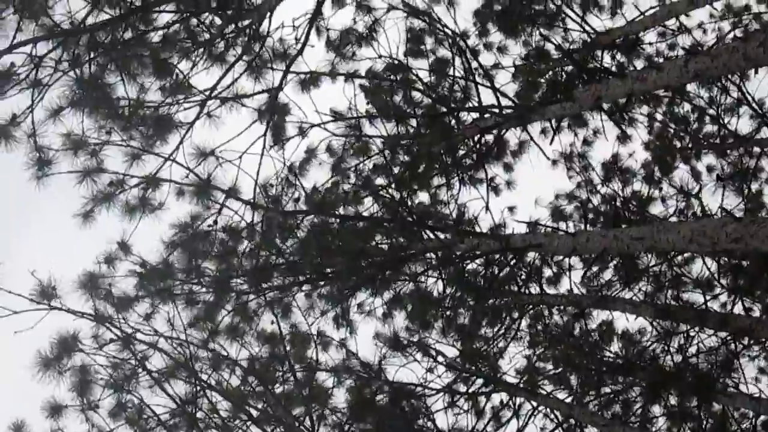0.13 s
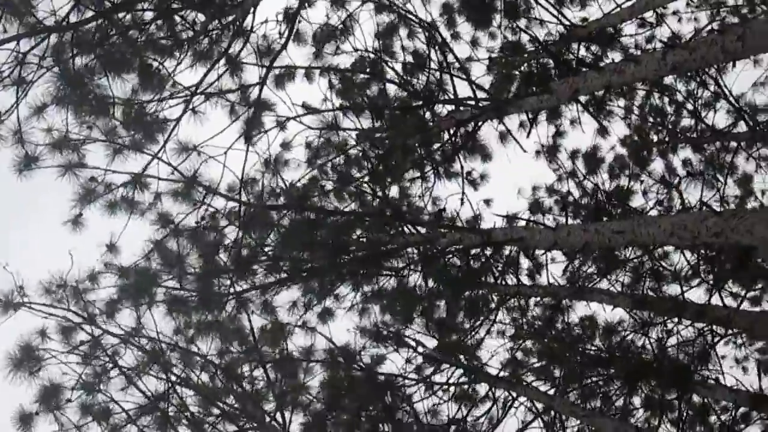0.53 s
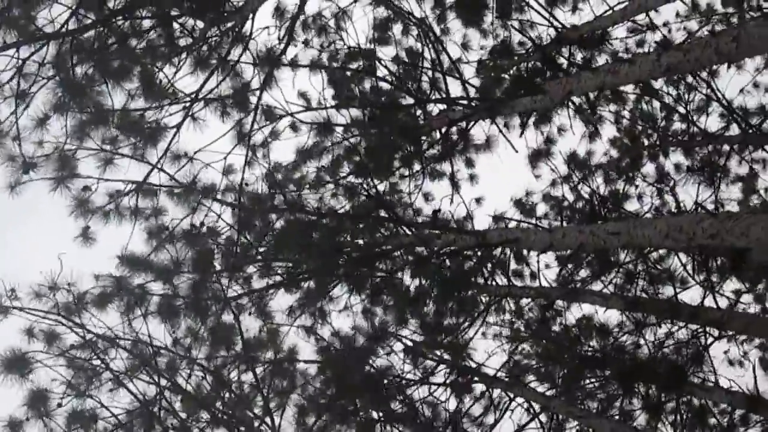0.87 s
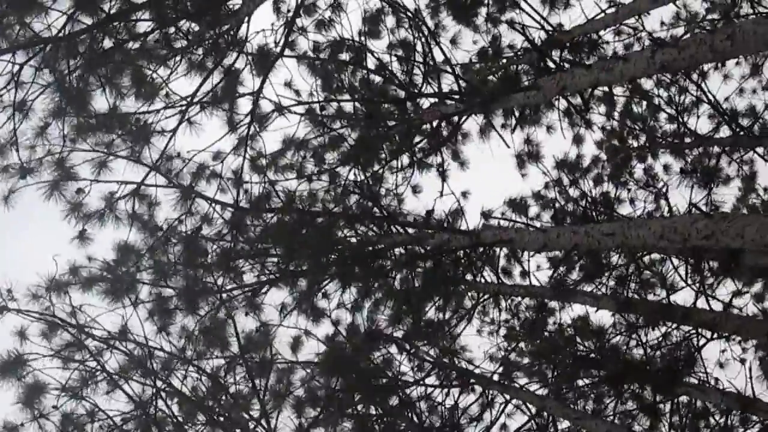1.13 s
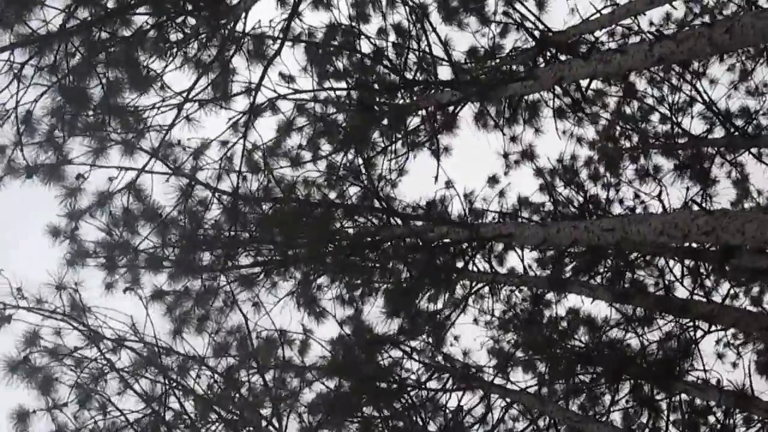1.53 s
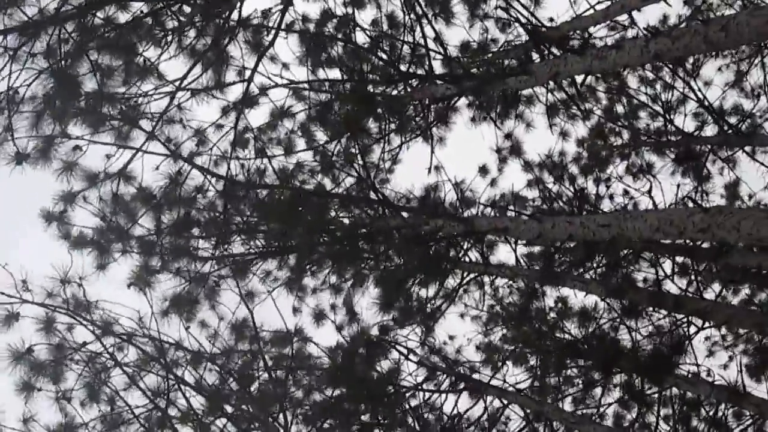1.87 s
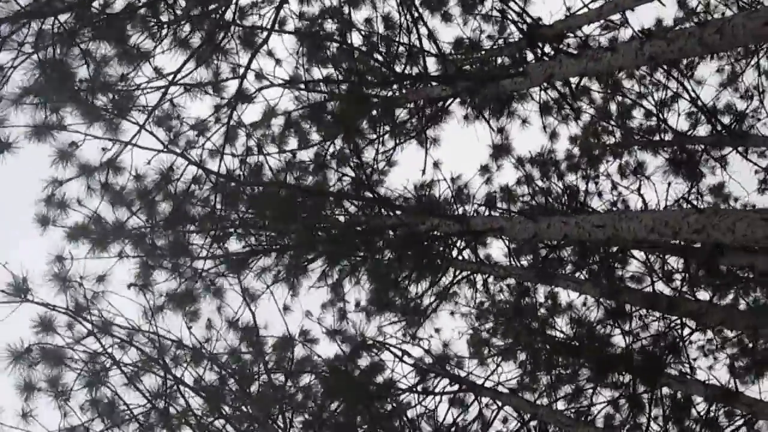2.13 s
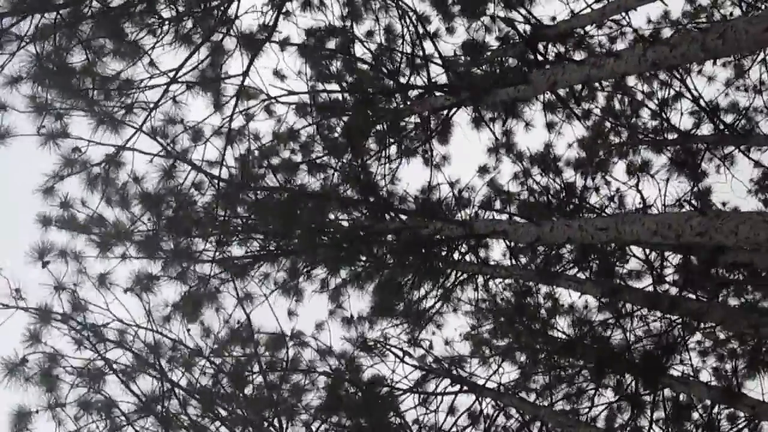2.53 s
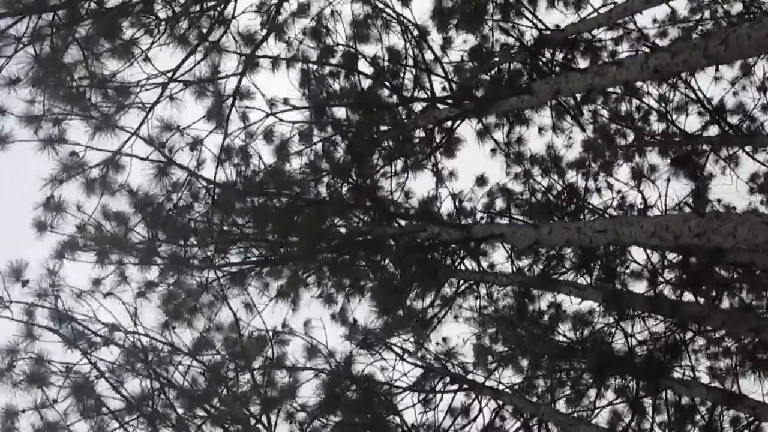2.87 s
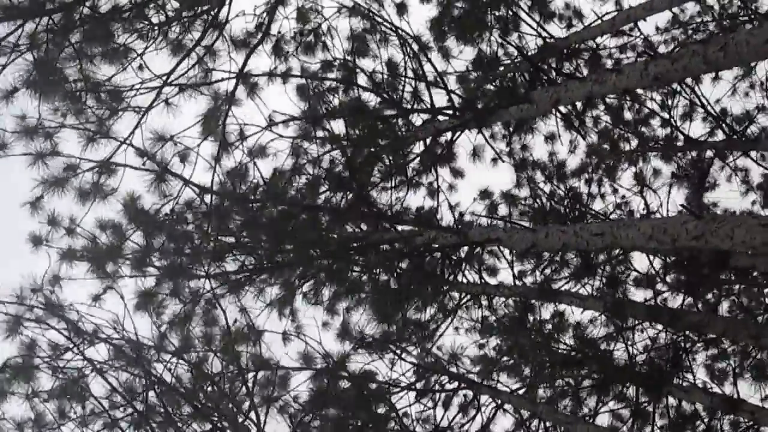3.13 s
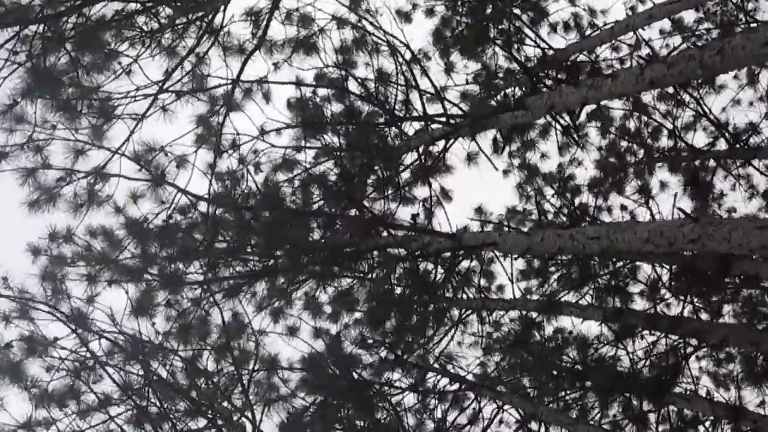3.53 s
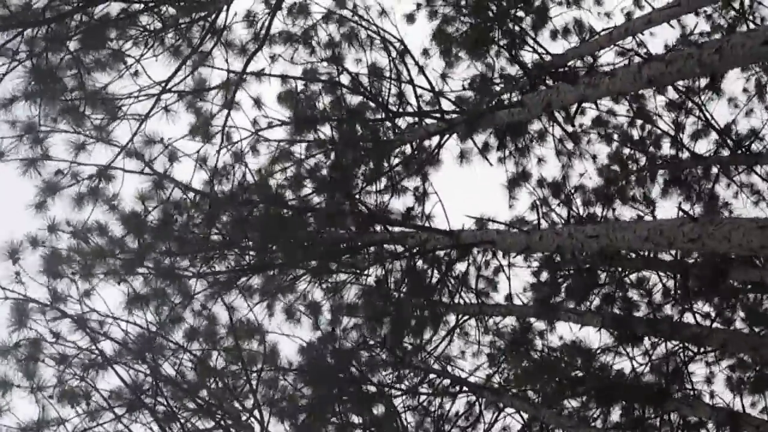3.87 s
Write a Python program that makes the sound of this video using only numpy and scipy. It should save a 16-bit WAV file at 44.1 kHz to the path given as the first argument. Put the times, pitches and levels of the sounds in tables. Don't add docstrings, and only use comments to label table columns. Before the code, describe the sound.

Wind rushes through tall pine crowns, a broad roar with fine needle hiss and twig ticks.

```python
import sys
import numpy as np
from scipy import signal
from scipy.fft import rfft, irfft
from scipy.io import wavfile
from scipy.ndimage import uniform_filter1d

SR = 44100
rng = np.random.default_rng(int(sys.argv[2]) if len(sys.argv) > 2 else 0)


def wav_record(signal):
    frames = np.transpose(np.atleast_2d(signal))
    bounded = np.clip(frames, -1, 1)
    quanta = np.round(bounded * 32767).astype(np.int16)
    wavfile.write(sys.argv[1], SR, quanta)


def invert_db(x):
    u = np.asarray(x, float) / 20
    return 10 ** u


N = 176400


def rms_one(x):
    return x / np.sqrt(np.mean(x ** 2) + 1e-20)


def in_time(rows):
    s, *columns = np.transpose(rows)
    return [np.interp(np.arange(N) / SR, s, c) for c in columns]


def at_hz(points, hz):
    table_hz, table_db = np.transpose(points)
    return np.interp(np.log(hz), np.log(table_hz), table_db)


def drift(rate_hz):
    r = np.exp(-80 * np.pi * rate_hz / SR)
    steps = rng.standard_normal(N // 40 + 2002)
    slow = signal.lfilter([1], [1, -2 * r, r * r], steps)[2000:]
    return np.interp(np.arange(N) / 40, np.arange(len(slow)), rms_one(slow))


def resonance(x, hz, width_hz):
    r = np.exp(-np.pi * width_hz / SR)
    poles = [1, -2 * r * np.cos(2 * np.pi * hz / SR), r * r]
    return signal.lfilter([(1 - r * r) / 2, 0, (r * r - 1) / 2], poles, x + 1e-18)


def dulled(x):
    return signal.sosfilt(signal.butter(3, 7060, fs=SR, output="sos"), x)


# f/Hz, level/dB
PORT_DIFFERENCE = [(1000, -60), (2500, -39.5), (3800, -27), (4800, -20), (6000, -17.5), (8000, -16),
                   (12000, -13)]


def rush(spectrum, shared_db, own_db, sway):
    low_hz, top_hz = spectrum[0][0], spectrum[-1][0]
    edges = np.geomspace(low_hz, top_hz, int(2 * np.log2(top_hz / low_hz) + 1.5))
    hz = np.maximum(np.fft.rfftfreq(N, 1 / SR), 1)
    shape = invert_db(at_hz(spectrum, hz)) * (hz > low_hz) * (hz < top_hz)
    mid_bins, side_bins = rfft(rng.standard_normal((2, N))) * shape
    place = np.interp(np.log(hz), np.log(edges), np.arange(len(edges)))
    mid = 0
    for k in range(len(edges)):
        band = irfft(mid_bins * np.clip(1 - np.abs(place - k), 0, 1), N)
        mid = mid + invert_db(own_db * drift(11)) * band
    side = irfft(side_bins * invert_db(at_hz(PORT_DIFFERENCE, hz)), N)
    return rms_one(invert_db(shared_db * sway) * np.array([mid + side, mid - side]))


# f/Hz, width/Hz, level/dB
CASE = [(2300, 380, 2), (3250, 480, -4), (4260, 450, -5), (5430, 400, -16), (8210, 400, -24)]
# t/s, level/dB
RUB = [
    (.036, -47.5),
    (.052, -55),
    (.061, -44),
    (.074, -42),
    (.080, -38),
    (.088, -35.5),
    (.097, -54),
    (.11, -90),
]


def finger_rub():
    level_db, = in_time(RUB)
    slips_per_s = 2300
    sizes = invert_db(2.9 * rng.exponential(1, N)) * rng.choice([-1, 1], N)
    slips = (rng.random(N) < slips_per_s / SR) * sizes
    slips = slips + 0.085 * rng.standard_normal(N)
    case = 0
    for k, (hz, width_hz, db) in enumerate(CASE):
        case = case + (-1) ** k * invert_db(db) * resonance(slips, hz, width_hz)
    loudness = np.sqrt(uniform_filter1d(case ** 2, size=200))
    return invert_db(level_db) * case / loudness


# t/s, level/dB of each tone
HOLLOW = [(0.039, -70, -62.5, -67), (.5, -64, -56, -54), (.85, -51.5, -60, -50), (1.1, -51, -41.5, -57),
          (1.35, -41.5, -50, -46), (1.55, -40, -46.5, -44), (1.8, -37, -42, -43), (2.1, -46, -51, -56),
          (2.4, -39.5, -59, -51), (2.65, -58, -53, -55), (3, -47, -45.5, -49), (3.2, -58, -64, -47),
          (3.3, -56, -56, -42), (3.6, -51, -59, -47), (3.85, -38, -48, -45.5), (4, -52, -52, -46)]
# f/Hz, width/Hz
HOLLOW_TONES = [(102, .4), (121, 2.4), (133, 3)]


def hollow_tones():
    octave_db = -10
    out = 0
    for k, ((hz, width_hz), level_db) in enumerate(zip(HOLLOW_TONES, in_time(HOLLOW))):
        tone = resonance(rng.standard_normal(2 * N), hz, width_hz)
        tone = resonance(tone, hz, 3 * width_hz)[N:]
        power = tone ** 2
        tone = tone / np.sqrt(uniform_filter1d(power, size=4400) + .1 * np.mean(power))
        voice = tone
        if k == 0:
            voice = tone + invert_db(octave_db) * (tone ** 2 - uniform_filter1d(tone ** 2, size=864))
        out = out + invert_db(level_db) * voice
    return out


# t/s, peak level/dB, centre f/Hz, half-width/octaves
TICKS = [(0.3205, -37, 8000, 0.27), (0.7430, -38, 7500, .3), (0.881, -20, 6000, 0.19),
         (0.8810, -42, 10200, .1), (1.5675, -32, 7500, .4), (1.6124, -30, 7500, .4), (1.627, -22, 9500, .4),
         (1.8406, -16, 5470, 0.46), (2.3008, -33, 7500, .3), (2.4773, -21, 8000, 0.86),
         (2.479, -20, 6000, 0.31), (2.7683, -37, 7500, .3), (3.3016, -32, 9000, .3),
         (3.6039, -28, 6500, .3), (3.731, -18, 3800, 0.33), (3.7346, -15, 5000, 0.5),
         (3.7378, -34, 10000, .35), (3.7600, -20, 4700, 0.25), (3.7640, -34, 8500, .3),
         (3.7820, -16, 6000, .9), (3.7900, -20, 5700, 0.13), (3.7960, -28, 9500, .4)]


def twig_ticks():
    crack_t60_s, tail_t60_s, tail_db, side_db = .009, 0.22, -15, -22
    out, t = np.zeros((2, N + SR)), np.arange(SR // 8) / SR
    shape = invert_db(-60 * t / crack_t60_s) + invert_db(tail_db - 60 * t / tail_t60_s)
    for s, db, hz, octaves in TICKS:
        crack, side = rng.standard_normal((2, len(t)))
        edges_hz = [hz * 2 ** -octaves, min(hz * 2 ** octaves, .45 * SR)]
        band = signal.butter(2, edges_hz, "band", fs=SR, output="sos")
        mid, side = signal.sosfilt(band, [crack * shape, side * shape * invert_db(side_db)])
        i = int(s * SR)
        out[:, i:i + len(t)] += invert_db(db) * np.array([mid + side, mid - side]) / np.abs(mid).max()
    return out[:, :N]


def fine_crackle(gust_db):
    clicks_per_s, level_db = 48, -70 + 20.5
    sizes = invert_db(5.2 * np.minimum(rng.exponential(1, N), 4)) * rng.choice([-1, 1], N)
    clicks = sizes * (rng.random(N) < clicks_per_s / SR)
    dealt = rng.integers(0, 6, N)
    fine = 0
    for k, hz in enumerate(np.geomspace(3500, 10000, num=6)):
        fine = fine + resonance(clicks * (dealt == k), hz, 0.45 * hz)
    return invert_db(level_db + gust_db - gust_db.max()) * fine


# f/Hz, level/dB per Hz
PORTS = [(18, -4), (50, 1), (80, 0.5), (160, -2)]
# t/s, level above the usual/dB, length/s
PUFFS = [
    (1.12, 13, .03),
    (1.233, 13, 0.044),
    (1.515, 9, 0.03),
    (1.718, 6, 0.066),
    (2.3, 3, 0.074),
    (3.4, 4, .06),
    (3.613, 0, 0.033),
]


def air_on_ports(gust_db):
    t = np.arange(N) / SR
    puffs_db = sum(db * np.exp(-((t - s) / length_s) ** 2) for s, db, length_s in PUFFS)
    return invert_db(gust_db - 19 + puffs_db) * rush(PORTS, 1.2, 1.0, drift(1.8))


# f/Hz, level/dB per Hz
NEEDLES = [(1200, -7), (2200, -1.5), (3300, -2.5), (5400, -4), (6330, -9.5), (7410, -19), (9500, -29),
           (14000, -49)]


def needles(gust_db, rustle_db, sway):
    top_db, follow = gust_db.max(), 0.92
    level_db = top_db - 3.5 + rustle_db + follow * (gust_db - top_db)
    return invert_db(level_db) * rush(NEEDLES, 0.22, .3, sway)


# f/Hz, level/dB per Hz
BOUGHS = [(80, -15), (200, -9.5), (434, -8.5), (621, -1), (820, -2), (1010, 0), (1590, -7.5), (2600, -17.5)]


def boughs(gust_db, sway):
    return invert_db(gust_db + 1.15) * rush(BOUGHS, 0.38, 0.41, sway)


# t/s, level/dB, extra rustle of the needles/dB
GUST = [(.04, -50, -2), (.2, -46, 0), (.35, -40, -0.5), (.5, -36.3, 0.5), (.65, -33, .3),
        (.85, -29.5, -0.5), (1.1, -29, -0.8), (1.5, -29, -.3), (2, -28.5, -.2), (2.5, -27.6, 0),
        (3, -27.5, 0.5), (3.5, -28, 1), (3.75, -28.5, 0.8), (4, -28, 1.2)]


def wind():
    gust_db, rustle_db = in_time(GUST)
    sway = 0.5 * drift(4.9) + 1.03 * drift(21)
    return boughs(gust_db, sway) + needles(gust_db, rustle_db, sway) + air_on_ports(gust_db)


def scene():
    gust_db, _ = in_time(GUST)
    near = dulled(finger_rub() + twig_ticks() + fine_crackle(gust_db))
    return near + hollow_tones() + wind()


def top_cut(x):
    return signal.sosfilt(signal.butter(12, 15500, fs=SR, output="sos"), x)


def record(dry):
    hiss_db, offset, start_s = -61.5, .0058, .03637
    tilt = signal.butter(2, 3500, "high", fs=SR, output="sos")
    hiss = signal.sosfilt(tilt, rng.standard_normal((2, N)))
    running = np.arange(N) / SR >= start_s
    return top_cut(running * (dry + invert_db(hiss_db) * hiss + offset))


dry = scene()
out = record(dry)
wav_record(out)
```